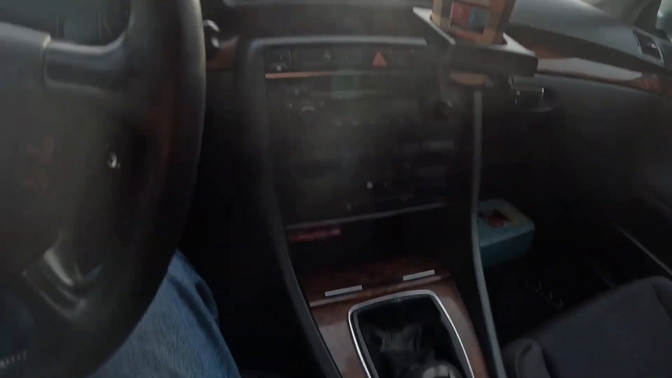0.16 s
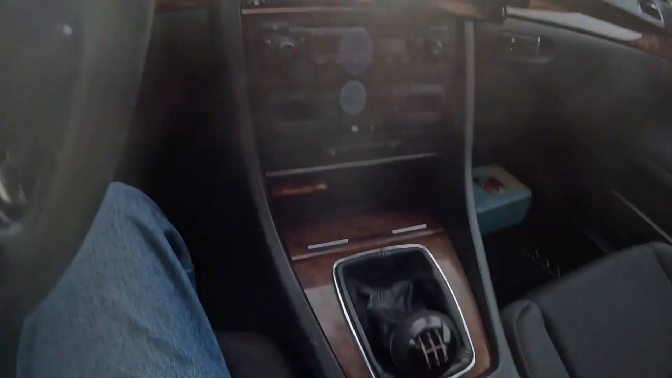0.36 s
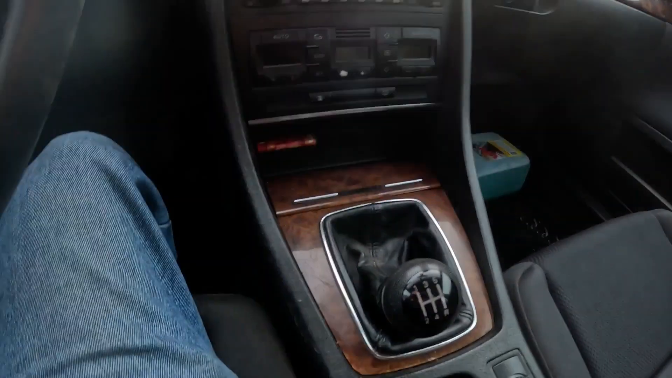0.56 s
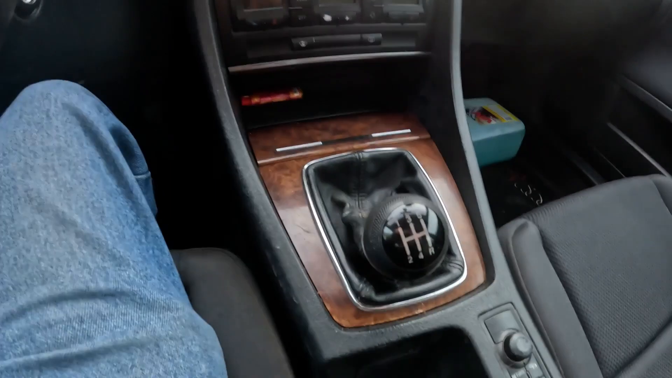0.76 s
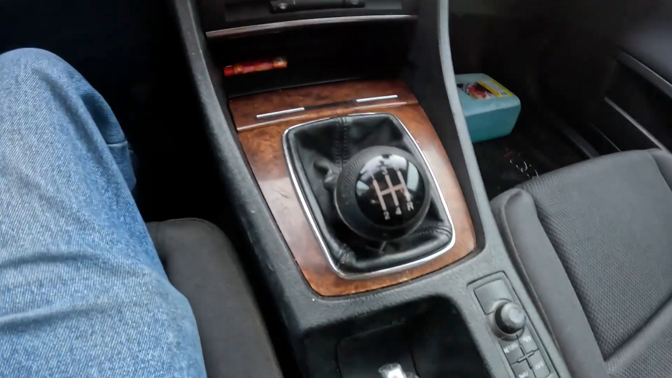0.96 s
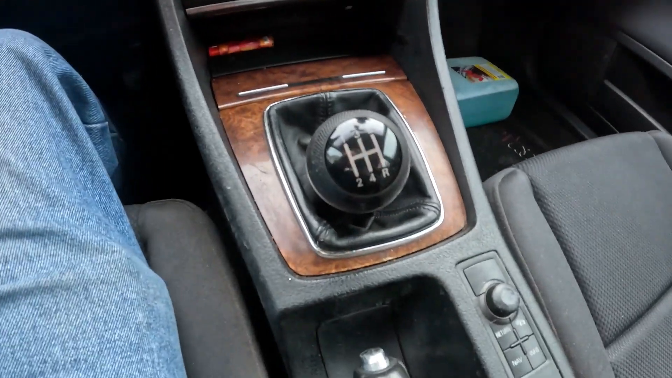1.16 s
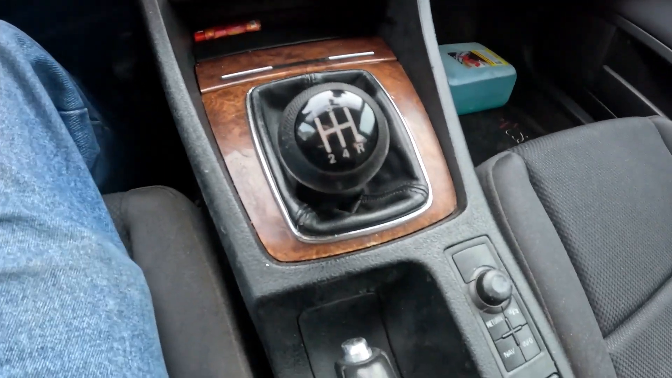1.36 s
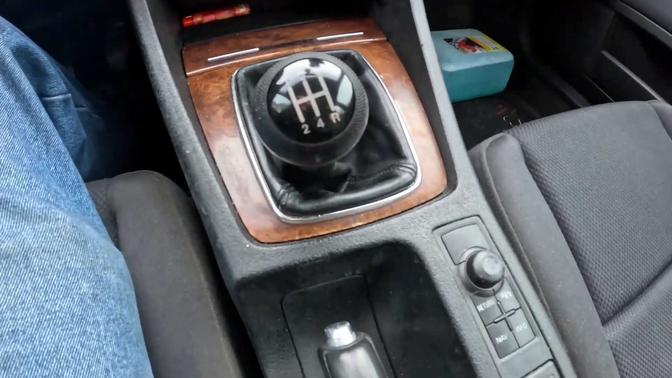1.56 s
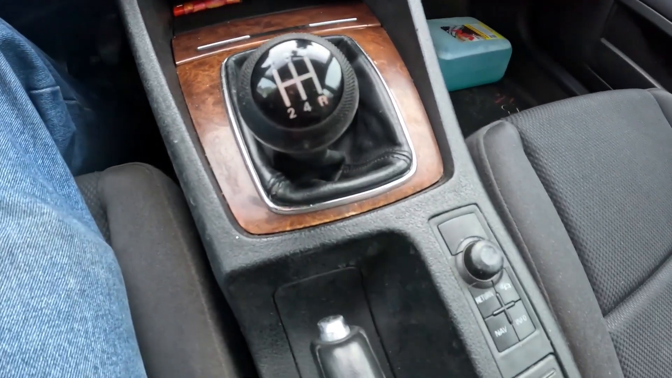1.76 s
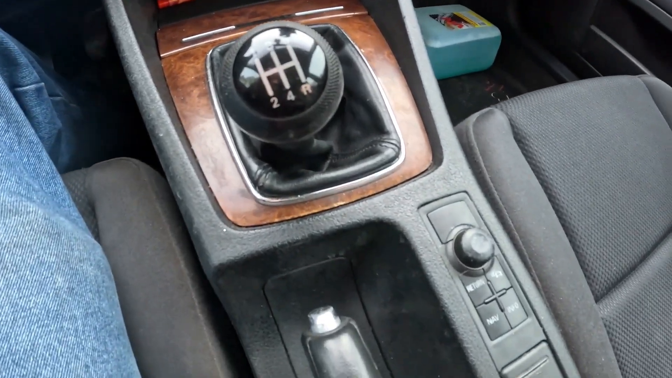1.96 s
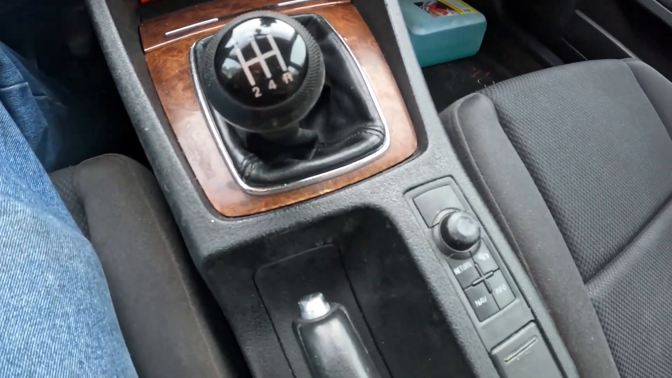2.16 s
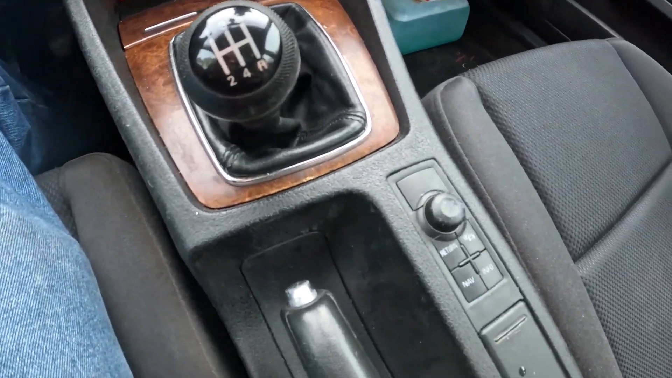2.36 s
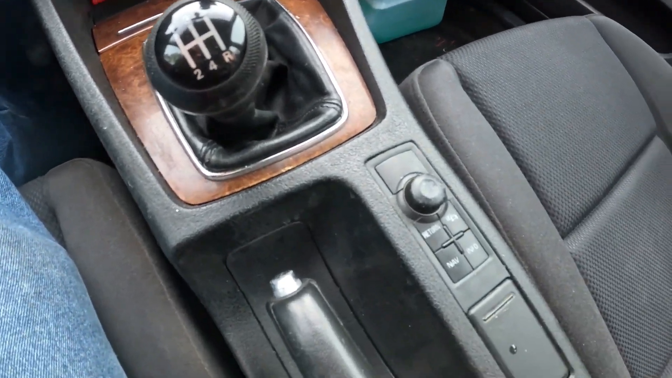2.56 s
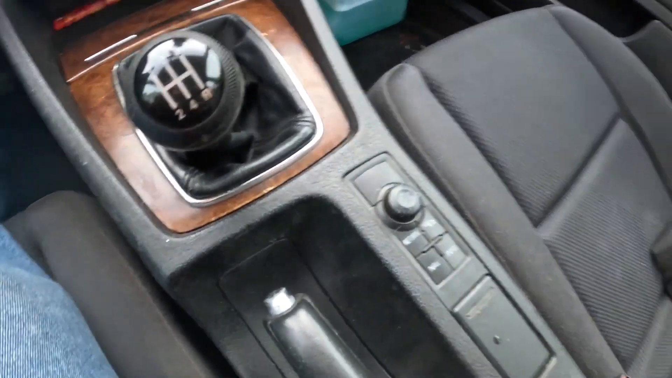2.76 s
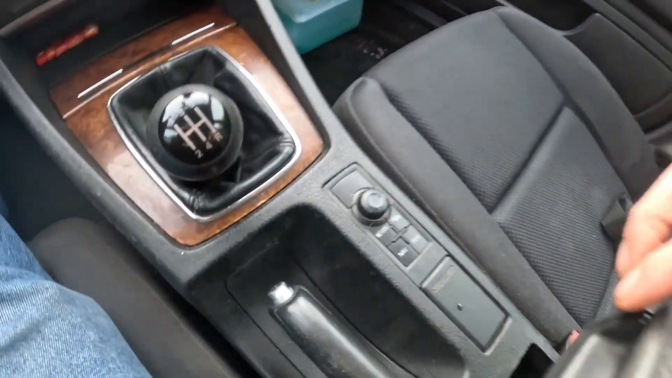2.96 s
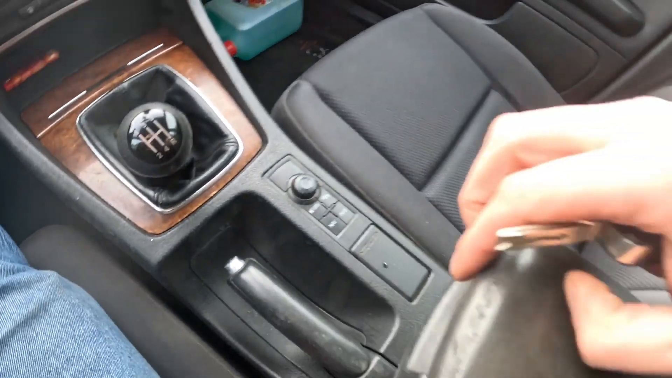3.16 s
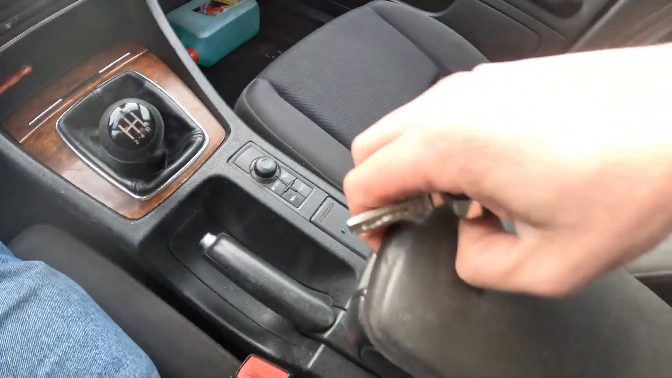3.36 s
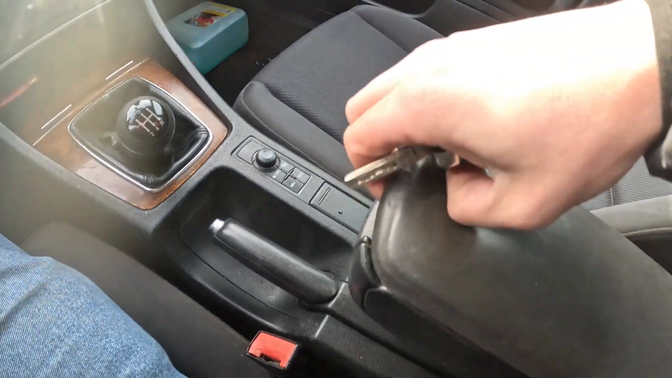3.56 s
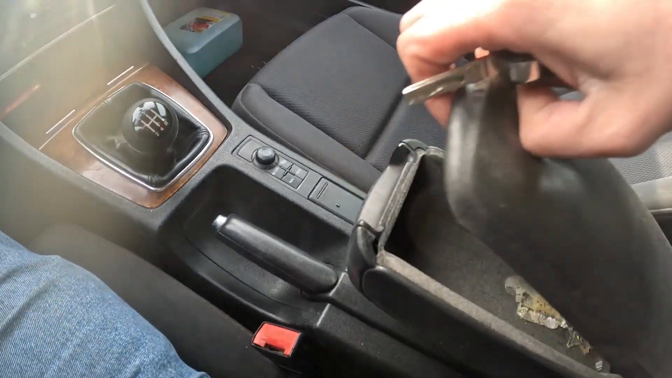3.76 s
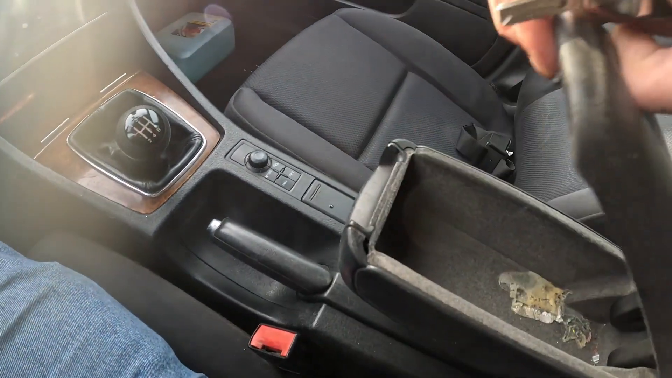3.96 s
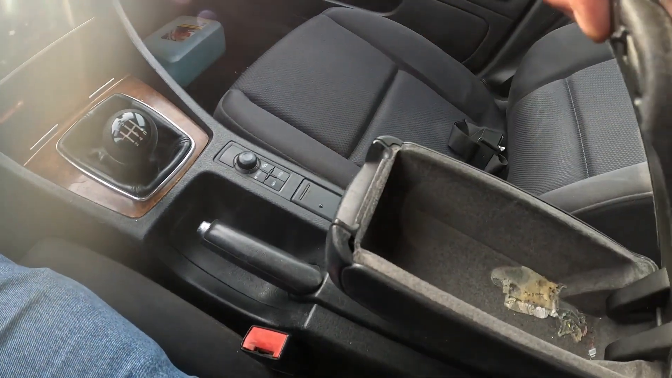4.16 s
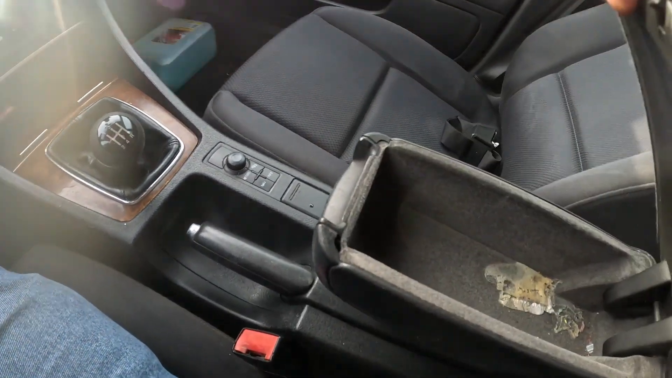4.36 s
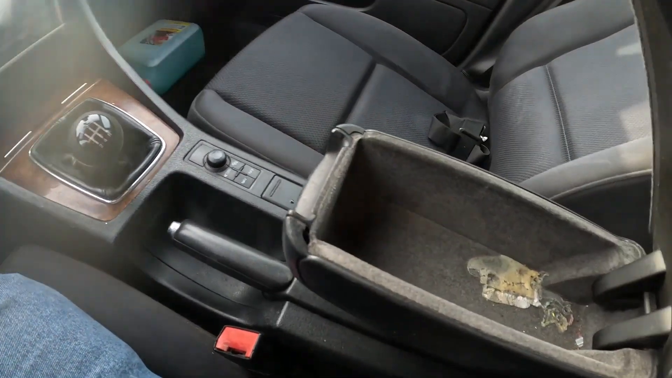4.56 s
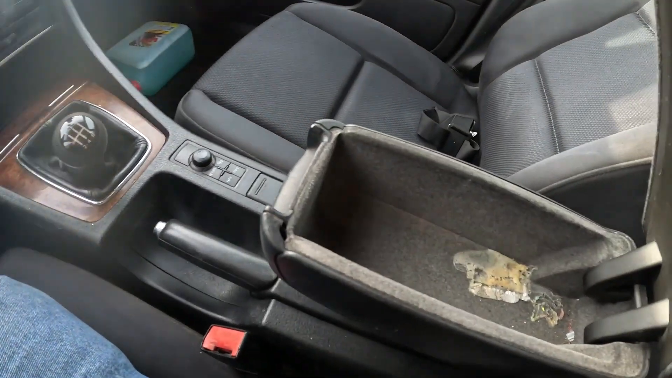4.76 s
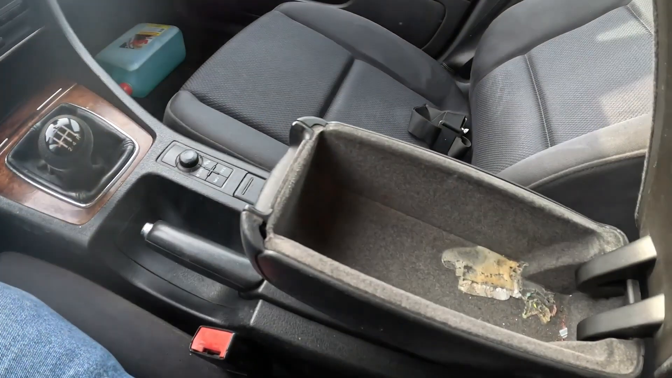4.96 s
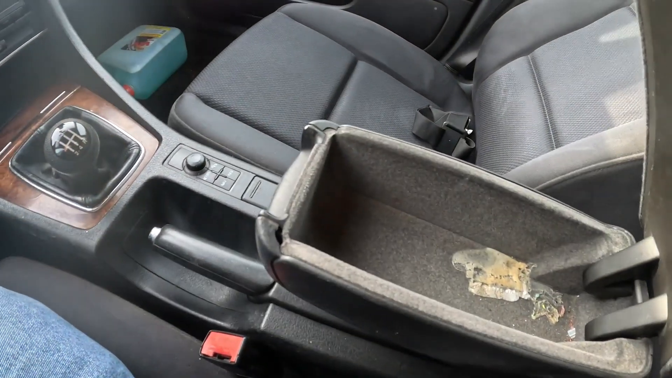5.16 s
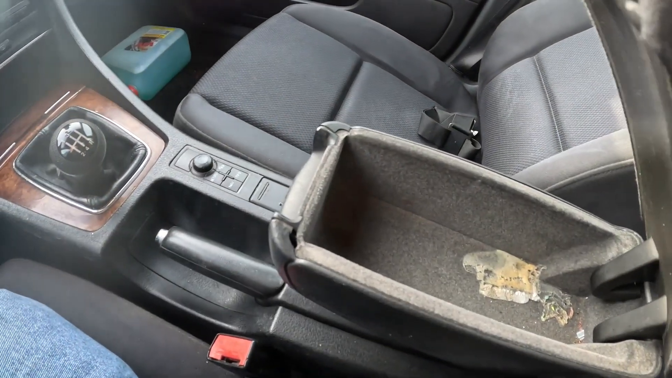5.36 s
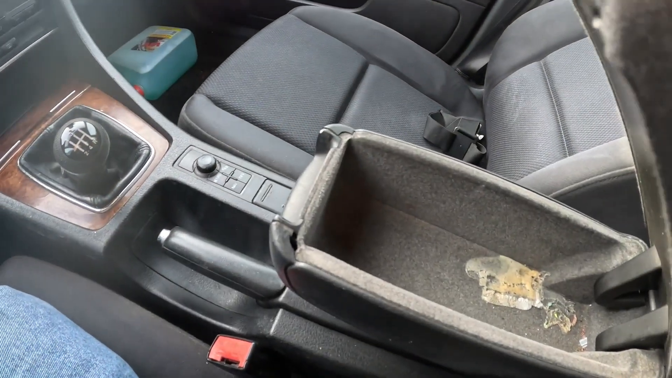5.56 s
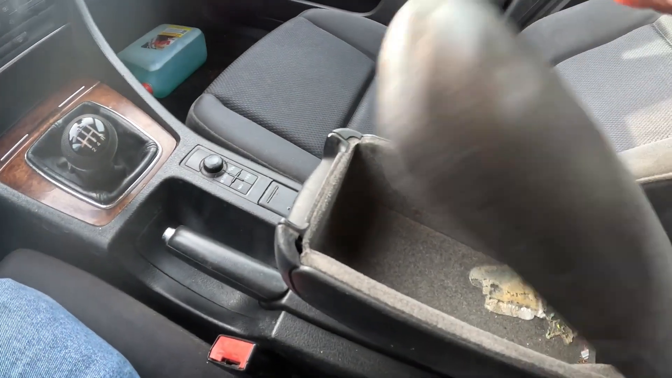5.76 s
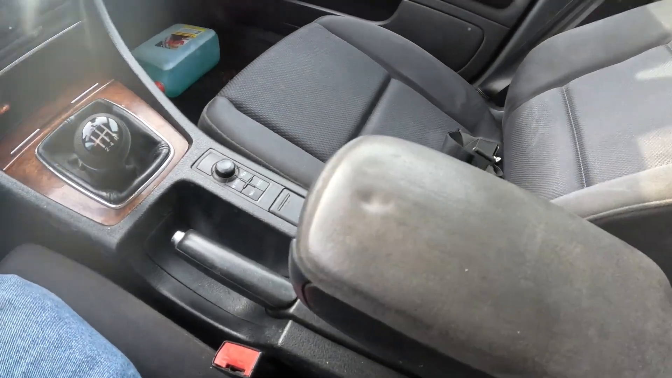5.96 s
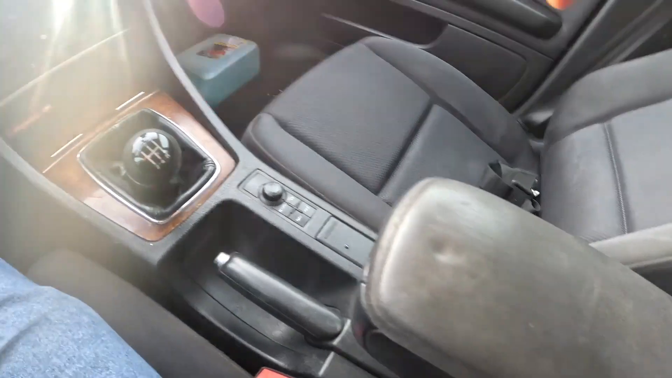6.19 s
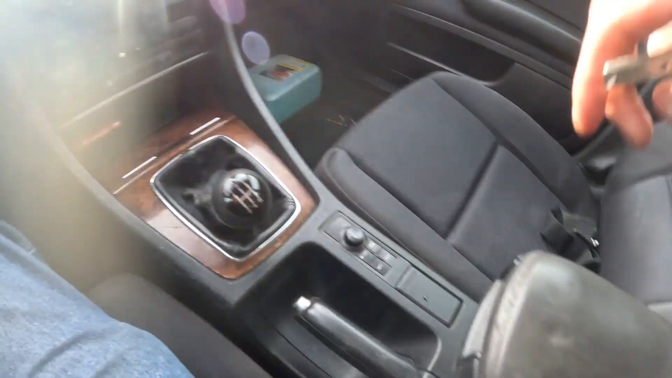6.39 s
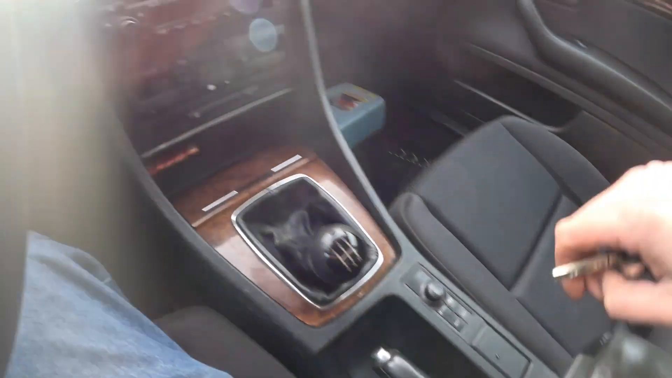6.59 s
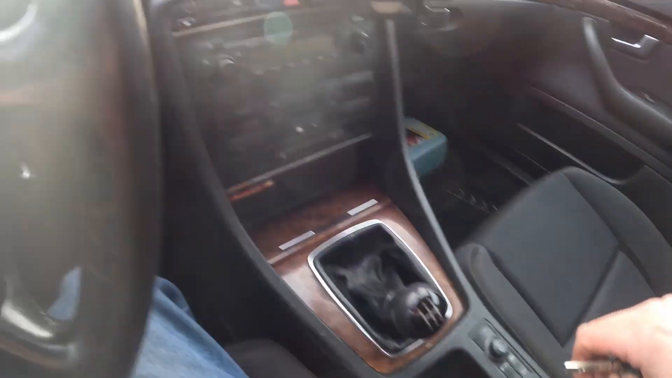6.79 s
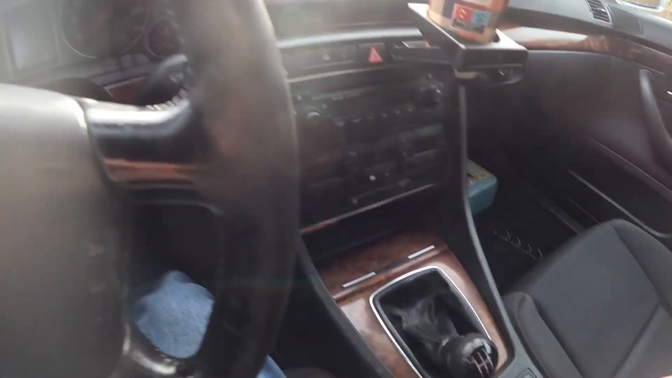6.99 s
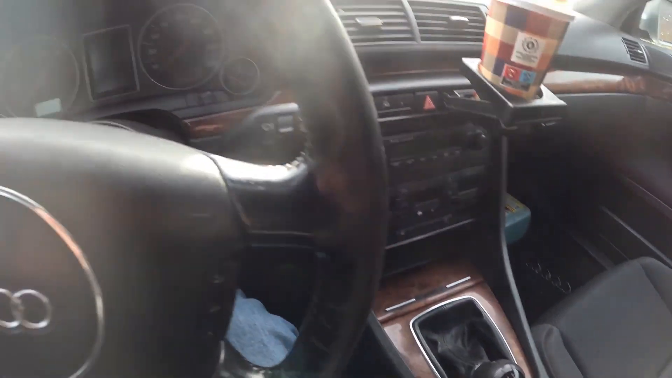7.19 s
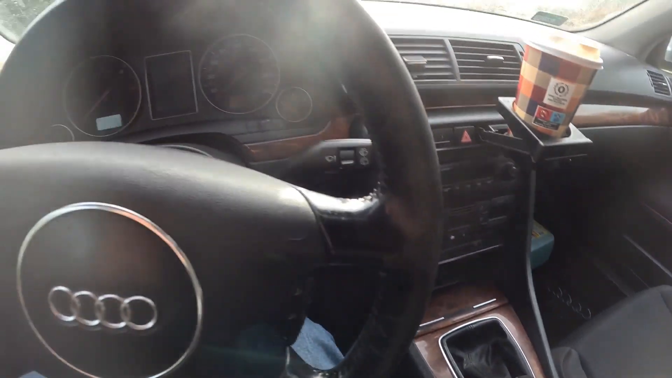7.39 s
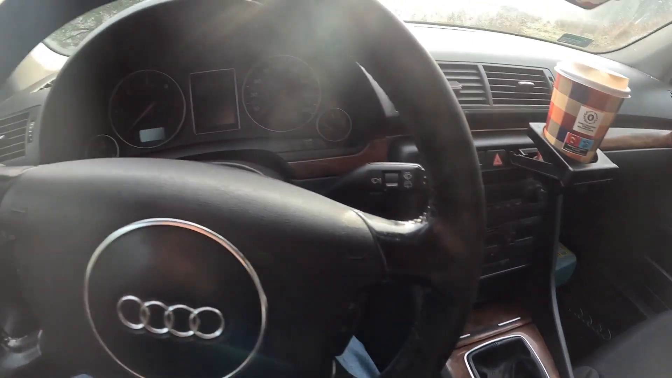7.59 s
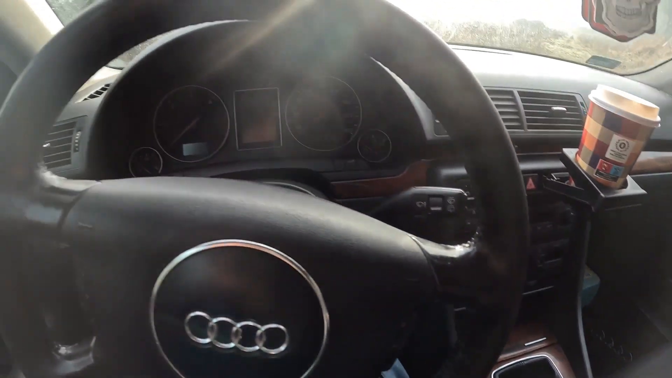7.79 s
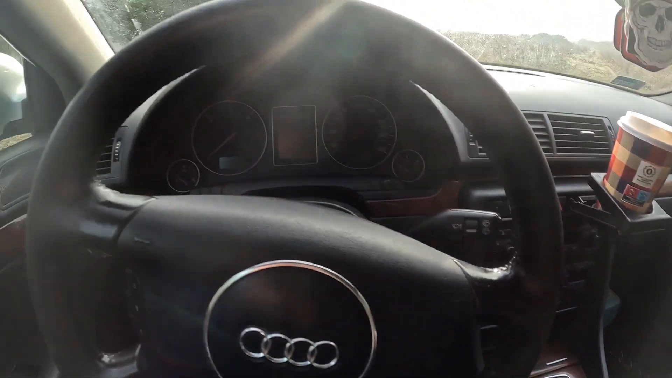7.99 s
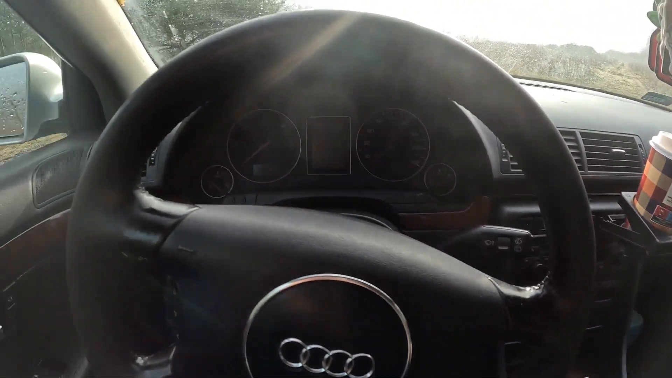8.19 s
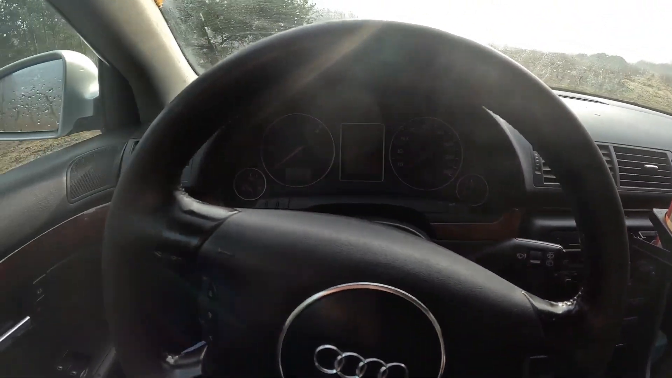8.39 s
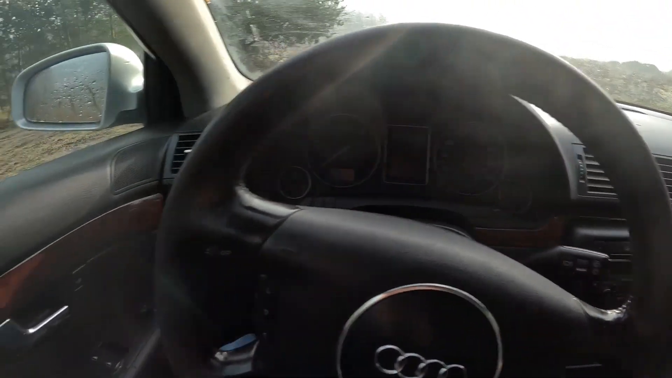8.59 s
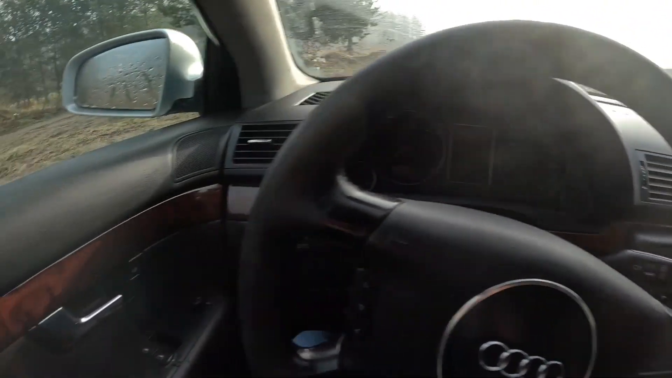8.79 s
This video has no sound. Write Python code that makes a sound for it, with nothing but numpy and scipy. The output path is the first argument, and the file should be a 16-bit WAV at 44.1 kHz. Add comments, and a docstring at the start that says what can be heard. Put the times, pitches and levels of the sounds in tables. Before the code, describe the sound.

A car's armrest lid is opened and slammed, heard close up in the small padded cabin. After a faint low boom and some rustling of clothes, a palm drags across leather while the latch and hinge click and briefly creak. The lid falls with a sharp, hollow clunk, by far the loudest sound, and bounces twice. Light metallic ticks of a key in the ignition follow, with more rustling and soft microphone rumble. The engine stays off.

```python
"""The lid of a car's armrest drops shut, close to a hand-held stereo microphone: shell and box clunk,
and it bounces twice. We are inside the parked car, engine off. Before the slam a hand rubs over the
crackling leather, unlatches the lid and lifts it through the clicks and stick-slip creaks of the hinge.
Afterwards a key rattles over the pins of the ignition lock. The driver's clothes rustle throughout;
behind them lie a faint boom of cabin air at the start, handling rumble, a low hum and hiss."""
import sys
import numpy as np
from scipy import signal
from scipy.fft import rfft, irfft
from scipy.io import wavfile
from scipy.ndimage import uniform_filter1d

SR = 44100
rng = np.random.default_rng(int(sys.argv[2]) if len(sys.argv) > 2 else 0)


def inscribe(sig):
    """Save sig as 16-bit PCM at rate SR to the path in sys.argv[1].

    A 1-D sig is mono; a 2-D sig holds one channel per row.
    Samples are clipped to [-1, 1] before scaling.
    """
    pcm = np.round(np.clip(np.atleast_2d(sig).T, -1, 1) * 32767)
    wavfile.write(sys.argv[1], SR, pcm.astype(np.int16))


N = 389844
TIME = np.arange(N) / SR
AGE = np.arange(SR // 4) / SR  # time since a blow, s
ATTACK = SR // 100  # a click's level is its energy spread over this many samples

# the lid lands on its pad, hits the rim and bounces:
# t/s, level/dB, contact/ms, box pitch/ratio, relative crack/dB, box ring time/ratio
LID_BLOWS = [(5.8998, -13, 1.4, 1.13, -21, 0.73), (5.9096, -2, 0.13, 1, -6, 0.95),
             (5.9915, -17, 0.4, 1.19, -14, 1), (6.032, -17, 1.3, 1.03, -28.5, 0.68)]
# modes of the lid's shell: f/Hz, level/dB, t60/s
SHELL_MODES = [(714, -18.5, .03), (785, -15, .028), (897, -13, .04), (1070, -3, 0.023), (1437, -25.5, .035),
               (1559, -18.5, .045), (1857, -24.5, 0.054), (2395, -28, .028), (2850, -13, 0.012),
               (3400, -19.5, .016), (3966, -20.5, .016), (4730, -24.5, .018), (5400, -30.5, .016),
               (7500, -24, .016), (9200, -33.5, .016)]
# modes of the air in the box under the lid: f/Hz, level/dB, t60/s
BOX_MODES = [(186, -8.5, .045), (222, 2, 0.068), (288, -11.5, 0.046), (370, -27, .05)]
# spectrum of the rim's crack: f/Hz, gain/dB
RIM_COLOUR = [(100, -22.5), (300, -7.5), (520, -6.5), (720, 1.5), (1200, 3), (1700, 0.5), (2150, -19),
              (2500, -8), (3200, -2), (4500, -13), (7800, -18.5), (11000, -28.5), (15000, -50.5)]
# the slam at the two microphone ports: f/Hz, left minus right/dB
SLAM_BALANCE = [(110, -0.5), (200, -1), (500, -2.5), (1200, -2.5), (2400, 1.5), (4400, 1), (12000, 1.5)]
# dull thumps through seat and console: t/s, level/dB, f/Hz, t60/s
DULL_THUMPS = [(0.76, -32.5, 71.5, 0.094), (1.077, -40.5, 219, 0.074), (2.84, -32, 64.4, 0.19),
               (3.607, -18.5, 387, 0.078), (3.631, -22, 60, 0.072), (3.651, -26, 49.3, 0.15),
               (4.255, -44, 151, 0.037), (4.573, -22, 149, 0.02), (4.655, -20, 172, 0.031),
               (5.895, -20.5, 52, .2), (5.916, -28.5, 75.8, .3), (5.987, -20.5, 61.5, 0.11),
               (6.03, -27.5, 73.6, 0.27), (6.074, -43.5, 93, 0.22), (8.779, -45, 138, 0.13)]
# plastic clicks of latch, hinge and trim:
# t/s, level/dB, relative body/dB, relative treble/dB, t60/s, the part's note f/Hz
PLASTIC_CLICKS = [(.043, -57.5, -0.5, 2, 0.031, 3750), (.474, -72, 11, -1, .04, 600),
                  (.566, -60.5, 1, -3, 0.065, 890), (.894, -49, -1, -11, 0.047, 630),
                  (.919, -42, -1.5, -13.5, 0.048, 1140), (1.07, -42, -14, -28, 0.032, 1250),
                  (1.445, -56.5, -19, -4, 0.032, 610), (1.476, -59, 5, -2, 0.072, 640),
                  (1.525, -57.5, 1.5, -17, 0.096, 1170), (1.591, -57, 2.5, -3, 0.066, 1590),
                  (1.956, -50, -15, 0, 0.055, 590), (2.789, -51, 9, -5.5, 0.045, 1320),
                  (2.835, -34, -6, -3.5, 0.06, 1750), (2.9, -43, 3.5, -8, 0.037, 700),
                  (2.927, -43.5, -3, -19, 0.035, 1320), (2.949, -45, 0.5, 1, 0.092, 636),
                  (2.996, -42, 2, -6, 0.095, 1320), (3.0195, -31.5, -3.5, -10, 0.025, 1350),
                  (3.362, -28, -2, -14, 0.035, 816), (3.401, -43.5, -1, -2, 0.045, 658),
                  (3.433, -48, 9, -18, 0.031, 605), (3.468, -37.5, -5.5, -7, 0.066, 930),
                  (3.51, -32.5, -2, -0.5, 0.067, 1100), (3.535, -31.5, -7, -12, 0.053, 960),
                  (3.557, -32, -2, -16.5, 0.034, 1130), (3.573, -57, -5, -24, 0.022, 950),
                  (3.6065, -25.5, -3, -6.5, 0.09, 630), (3.621, -28.5, 4, -19, 0.016, 1050),
                  (3.821, -35, -6, -13.5, 0.034, 586), (3.885, -33, -19, -6.5, 0.04, 2240),
                  (4.047, -31, -15.5, -3, 0.038, 1520), (4.147, -32.5, -21.5, -1, 0.034, 1270),
                  (4.571, -46, 8.5, -7.5, 0.062, 980), (4.6355, -31.5, -4, -9.5, 0.03, 1730),
                  (4.655, -38, 3.5, -8, 0.0068, 494), (5.257, -36.5, -21, -5.5, 0.071, 1560),
                  (5.266, -43.5, -6.5, -27, 0.034, 1150), (5.275, -46.5, 3, -13, 0.061, 1550),
                  (5.72, -64, -8.5, 2, 0.097, 1430), (5.807, -59, -10.5, 5, 0.066, 2400),
                  (6.0455, -46, 6.5, -14, 0.028, 585)]
# resonances of the hollow plastic console: f/Hz, width/Hz, level/dB
CONSOLE_MODES = [(203, 52, -7.5), (343, 190, -6), (544, 390, -4.5), (708, 180, 0.5), (994, 86, -0.5),
                 (1190, 167, 1), (1470, 350, -4), (2110, 150, -7), (2560, 680, -8.5), (3240, 720, -6.5),
                 (4550, 920, -8), (5654, 1500, -10.5), (6650, 900, -11.5), (7560, 450, -16),
                 (9300, 1200, -24.5), (12600, 1600, -39.5)]
# where the clicks lie as the microphone turns: t/s, left minus right/dB
CLICK_BEARING = [(0, 0), (2, 1.5), (2.85, -1.5), (3.45, -1), (4.1, -2.5), (4.65, -4), (5.8, -2.5), (7, 3.5)]
# knocks on stiff parts: t/s, level/dB, f/Hz, t60/s
RINGING_KNOCKS = [(1.071, -36.5, 1284, .05), (4.637, -29, 1730, 0.026), (7.9635, -47, 661, 0.046)]
# creaks of the hinge: t/s, length/s, level/dB, main resonance f/Hz, muffled above f/Hz
HINGE_CREAKS = [(4.636, 0.0045, -34.5, 657, 1390), (5.265, 0.018, -52, 660, 1400),
                (5.467, 0.0073, -41, 568, 1510), (5.482, 0.014, -47.5, 572, 1540),
                (5.506, 0.0065, -54, 581, 640), (5.575, 0.0033, -43, 602, 1580),
                (5.585, 0.0081, -47, 583, 750), (5.608, 0.0094, -54, 580, 600)]
# modes of the hinge: multiple of the main resonance, level/dB, t60/s
HINGE_MODES = [(0.599, -23, 0.023), (1, 7.5, 0.046), (1.801, 3, 0.017), (2.3, -5, .015), (2.7, -39, 0.019)]
# the key finds the lock, rattles in, seats and turns:
# t/s, level/dB, relative treble/dB, the pin's note f/Hz, relative tick of the tip/dB
KEY_CONTACTS = [(6.769, -60, 2, 7750, 0), (6.974, -52, 7.5, 4780, -16), (6.989, -49.5, 1.5, 3570, -22),
                (7.011, -45.5, 1, 5240, -26), (7.0354, -52, 2, 3400, -25), (7.052, -49, 0.5, 3570, -26),
                (7.0732, -52, 3.5, 4500, -23), (7.0995, -50, 4, 3500, -28), (7.214, -53, 6, 6050, -17.5),
                (7.364, -54, -4, 910, -16), (7.598, -72.5, 16, 3340, 9), (7.964, -51.5, 6, 6400, -9)]
# modes of the lock and its column: f/Hz, level/dB, t60/s
LOCK_MODES = [(225, -5.5, 0.088), (423, -6, 0.085), (660, -2.5, 0.038), (791, -2.5, 0.044),
              (1073, -1, 0.022), (1310, 0.5, 0.026), (1690, 4, 0.0068), (2437, -4, 0.015),
              (3090, 1.5, 0.01), (3640, 1, 0.011), (4790, 5, 0.0027), (6090, 2.5, 0.0037),
              (7420, 3, 0.0026), (9200, -3.5, 0.0033)]
# the palm judders over the leather, slower as it grips: t/s, slip rate/Hz, level/dB
PALM_JUDDER = [(3.04, 133, -59), (3.12, 118, -56), (3.17, 104, -51.5), (3.21, 92, -45.5), (3.25, 70, -48),
               (3.29, 61, -46), (3.34, 54, -43.5), (3.42, 35, -46)]
# fingers crease the leather: start t/s, length/s, level/dB
LEATHER_STROKES = [(2.8, 0.36, -57.5), (3.08, 0.43, -54), (3.45, 0.11, -55.5), (4.84, 0.2, -75),
                   (7.4, 0.3, -68)]
# spectrum of its crackle: f/Hz, gain/dB
CRACKLE_COLOUR = [(300, -16), (600, 4), (1300, -5), (2000, -8), (2700, 3), (3500, -1), (4100, -6.5),
                  (4900, -3), (6500, -11), (10000, -24), (15000, -32)]
# the palm drags on the padding, weight shifts in the seat: start t/s, length/s, level/dB
PADDING_STROKES = [(0.8, 0.51, -67), (1.38, 0.75, -75), (2.75, 0.29, -52.5), (2.98, 0.91, -46.5),
                   (3.65, 0.83, -64.5), (4.45, 0.34, -61.5), (5.2, 0.48, -60.5), (5.65, 0.5, -58),
                   (6.349, 0.6, -61.5), (6.849, 0.36, -63.5), (7.1, 0.6, -66.5), (7.6, 0.63, -72),
                   (8.4, 1, -66.5)]
# spectrum of that drag: f/Hz, gain/dB
PADDING_COLOUR = [(60, -20), (95, 2.5), (130, 2), (199, 0.5), (295, -0.5), (435, -4), (570, -6.5),
                  (835, -14.5), (1030, -10.5), (1200, -13), (1560, -38), (2640, -120)]
# scuffs of sleeve, seat and padding, and one late swell of low hum near 140 Hz: middle t/s, length/s, level/dB,
# f/Hz, width/Hz
BRIEF_SCUFFS = [(0.266, 0.051, -67, 700, 900), (0.489, 0.06, -68, 7600, 910),
                (0.773, .32, -60.5, 1290, 151), (0.971, 0.35, -61.5, 1130, 171.5),
                (0.995, 0.31, -69, 334, 140), (2.524, .3, -69.5, 1380, 400),
                (3.077, 0.19, -62.5, 4940, 5000), (3.711, 0.25, -66, 3800, 3500),
                (3.791, 0.087, -42.5, 660, 520), (4.496, 0.24, -70.5, 1790, 400),
                (4.893, 0.057, -53, 820, 650), (5.398, 0.12, -58, 370, 150),
                (5.746, 0.12, -59.5, 524, 78.5), (5.902, 0.053, -30.5, 950, 600),
                (5.899, 0.064, -50.5, 3300, 3000), (5.902, 0.068, -27.5, 285, 200),
                (5.964, 0.049, -40, 402, 49.5), (7.324, 0.04, -56, 803, 700),
                (7.436, 0.052, -57.5, 857, 717), (8.45, 0.82, -65.5, 140.6, 50),
                (8.778, 0.024, -52, 599, 390)]
# strokes of sleeve and jeans: start t/s, length/s, level/dB, relative treble/dB
CLOTH_STROKES = [(-0.3, 0.69, -72, 2), (0.152, .7, -71.5, -1.5), (0.538, 0.68, -65, -4),
                 (0.969, .38, -62, -5.5), (1.289, .52, -64.5, -2), (1.6, 0.58, -77.5, 1.5),
                 (2.194, 0.58, -72, -1), (2.722, .35, -56, -2), (2.978, 0.55, -50.5, -7),
                 (3.398, .23, -53, -3.5), (3.48, 0.63, -60.5, -5), (3.892, .5, -65.5, -2.5),
                 (4.25, .35, -74.5, -6.5), (4.457, .29, -63.5, -3), (4.631, 0.42, -73.5, 2),
                 (4.848, 0.57, -76.5, -2), (5.152, .3, -66, -4.5), (5.254, .55, -82.5, -4),
                 (5.7, .3, -67, 2.5), (5.853, 0.78, -72.5, -2), (6.201, 0.99, -68.5, -2.5),
                 (6.803, 0.35, -63, 1.5), (7.016, 0.49, -66.5, -5.5), (7.3, .4, -63.5, -3),
                 (7.552, .5, -72, -2.5), (7.599, .75, -80.5, -7), (8.443, 0.74, -71, -1)]
# spectrum of their rustle: f/Hz, gain/dB
RUSTLE_COLOUR = [(470, -30.5), (800, -21.5), (1100, -6.5), (1320, -6), (1590, -7), (2470, -14.5),
                 (3320, -11.5), (4350, -15.5), (4910, -12), (5830, -15), (7280, -16), (8330, -21.5),
                 (10100, -23.5), (12200, -30.5), (15000, -52)]
# treble resonances of the weave: f/Hz, width/Hz
WEAVE_BANDS = [(4300, 700), (5400, 900), (7400, 1000)]
# gliding swishes of denim and sleeve: start t/s, length/s, level/dB, first f/Hz, last f/Hz
DENIM_SWISHES = [(.48, 0.46, -78, 7300, 7750), (.55, 0.41, -72, 4630, 4230),
                 (0.952, 0.42, -67.5, 3910, 4320), (1.397, 0.44, -70, 4700, 5320),
                 (1.477, 0.26, -67, 2900, 3160), (2.278, 0.51, -72.5, 5160, 5920),
                 (3.124, 0.4, -57, 4670, 5160), (7.373, 0.32, -61.5, 3300, 3760)]
# handling rumble on the microphone: t/s, level/dB
HANDLING_LEVEL = [(0.2, -55), (1.6, -54), (2.1, -58), (2.6, -58), (2.9, -45), (3.6, -42.5), (4.25, -61),
                  (4.6, -48), (5.15, -55.5), (5.85, -59), (6.02, -43.5), (6.3, -59), (6.95, -54),
                  (7.5, -59.5), (8.2, -60), (8.84, -52)]
# its spectrum: f/Hz, gain/dB
HANDLING_COLOUR = [(8.8, -26.5), (15, 6), (57, -3.5), (68, -9.5), (87, -16), (130, -19.5), (166, -27),
                   (300, -28), (390, -50.5), (660, -120)]
# bands of the cabin's low hum: f/Hz, width/Hz, level/dB
HUM_BANDS = [(53, 14, -63.5), (122, 8.6, -79.5)]
# slow swell of the hum: t/s, gain/dB
HUM_SWELL = [(0, 7.5), (1.3, -8), (2.4, 6), (3.9, -2), (4.5, -8), (5.2, -1), (6.6, -3), (7.6, -11),
             (8.84, -15)]
# spectrum of the steady hiss: f/Hz, gain/dB
HISS_COLOUR = [(100, -3.5), (300, 0.5), (450, -2.5), (850, -9.5), (1250, -5.5), (2300, -15), (3800, -18.5),
               (5200, -13.5), (7500, -14.5), (8500, -18), (11000, -25), (15000, -36)]


def lid(crack_t60=.025, rattle_db=-21, rattle_t60=.065, box_swell_s=.008, leak_hz=170):
    """Each blow pushes the shell and squeezes the box; a longer contact is duller. The rim cracks."""
    out = np.zeros((2, N))
    for s, db, contact_ms, pitch, crack_db, life in LID_BLOWS:
        push = AGE * np.exp(-AGE / (contact_ms * 1e-3 / 4))
        box = ring([(hz * pitch, mode_db, t60 * life) for hz, mode_db, t60 in BOX_MODES])
        response = ring(SHELL_MODES) - box * (1 - fade(box_swell_s))
        body = band(drive(push / push.sum(), response), leak_hz, "highpass", order=1)
        scatter = noise(len(AGE), side_db=-6) * (fade(crack_t60) + undb(rattle_db) * fade(rattle_t60))
        crack = unit(colour(scatter, RIM_COLOUR)) * np.sqrt(np.mean(fade(crack_t60) ** 2))
        add(out, s, (body + undb(crack_db) * crack) * undb(db))
    return out


def thumps():
    """Soft blows swing a panel or the cabin air for a few cycles."""
    out = np.zeros((2, N))
    taper = np.sqrt(np.linspace(1, 0, len(AGE)))
    for s, db, hz, t60 in DULL_THUMPS:
        add(out, s, ring([(hz, db, t60)]) * taper)
    return band(out + 1e-18, 930, "lowpass", order=2)


def clicks(snap_db=17, tail_db=-24, tail_t60=.13):
    """A sharp release and its scatter off nearby trim ring the console and the part's own note."""
    out = np.zeros((2, N))
    count = SR // 10
    console = sum((-1) ** k * width * ring([(hz, db, np.log(1000) / np.pi / width)])
                  for k, (hz, width, db) in enumerate(CONSOLE_MODES))
    registers = [band(console, edges, "bandpass") for edges in ((130, 410), (450, 2500), (2500, 22000))]
    lives = 1.2, 1, .7  # ring time ratios: the treble dies first
    for s, db, body_db, treble_db, t60, hz in trim_ticks() + list(PLASTIC_CLICKS):
        scatter = noise(count, side_db=-5)
        levels_db = db + np.array([body_db - 4.5, -3.5, treble_db - 4.5])
        for register, life, level_db in zip(registers, lives, levels_db):
            force = scatter * (fade(t60 * life) + undb(tail_db) * fade(tail_t60 * life))[:count]
            force[:, 0] += undb(snap_db)
            part = drive(force, stress(register[:count // 2], hz, boost_db=3.5, width_share=.12))
            add(out, s, unit(part) * np.sqrt(ATTACK / part.shape[1]) * undb(level_db) * bearing(s))
    return out


def knocks():
    """A stiff part rings briefly with one note."""
    out = np.zeros((2, N))
    for s, db, hz, t60 in RINGING_KNOCKS:
        add(out, s, ring([(hz, db, t60)]) * bearing(s))
    return out


def creaks(slip_hz=210, grit_db=-24):
    """Uneven slips, with grit between them, ring the hinge under its padding."""
    out = np.zeros((2, N))
    for s, length, db, hz, muffle_hz in HINGE_CREAKS:
        gap, size = .5 + rng.random((2, 20))
        slip_times = (np.cumsum(gap) - gap[0]) / slip_hz
        force = undb(grit_db) * noise(len(AGE), side_db=2)
        force += np.bincount((slip_times * SR).astype(int), size, len(AGE))[:len(AGE)]
        hinge = ring([(hz * multiple, mode_db, t60) for multiple, mode_db, t60 in HINGE_MODES])
        muffled = band(drive(force * (AGE < length), hinge), muffle_hz, "lowpass")
        add(out, s, unit(muffled) * np.sqrt(length / AGE[-1]) * undb(db))
    return out


def key(gain_db=-1, snap_db=9, scrape_t60=.051, tip_t60=.024, tip_db=-6):
    """Each pin snaps against the key with a bright tick and a short scrape that ring the lock."""
    out = np.zeros((2, N))
    lock = sum((-1) ** k * ring([mode]) for k, mode in enumerate(LOCK_MODES))
    registers = band(lock, 2470, "lowpass"), band(lock, (2500, 10500), "bandpass")
    for s, db, treble_db, hz, tick_db in KEY_CONTACTS:
        force = noise(len(AGE), side_db=-7) * fade(scrape_t60)
        force[:, 0] += undb(snap_db)
        body, pin = (drive(force, stress(x, hz, boost_db=4, width_share=.18)) for x in registers)
        tip = band(noise(len(AGE), side_db=-6.5) * fade(tip_t60), (9500, 13000), "bandpass", order=2)
        for part, part_db in ((body, 0), (pin, treble_db), (tip, tick_db + tip_db)):
            add(out, s, unit(part) * np.sqrt(ATTACK / len(AGE)) * undb(db + part_db + gain_db) * pan(.5))
    return out


def judder(tap_db=-.5, grit_db=-7, grit_decay_cycles=.93, jitter_share=.16, spread_db=2.5):
    """Skin sticks and slips on the padding: a soft tap and a puff of grit in each uneven cycle."""
    rate, level_db = curve(PALM_JUDDER)
    phase = np.cumsum(rate * (1 + jitter_share * walk(120))) / SR % 1
    slips = (np.diff(phase, prepend=0) < 0) * undb(spread_db * walk(150))
    taps = colour(slips[None], [(90, -9), (200, 2), (300, 5), (450, -1), (590, 5), (740, -12),
                                (1100, -6), (2200, -23), (12000, -73)])
    puffs = noise(N, side_db=-2) * np.exp(-phase / grit_decay_cycles)
    grit = colour(puffs, [(700, -18), (1100, -13), (1700, 2), (2300, -1), (3000, 1), (3600, 2),
                          (4200, -7), (5000, -12), (6500, -9), (12000, -38)])
    touching = (TIME > PALM_JUDDER[0][0]) & (TIME < PALM_JUDDER[-1][0])
    return (undb(tap_db) * unit(taps) + undb(grit_db) * unit(grit)) * undb(level_db) * touching


def leather(cracks_per_s=170, crack_t60=.012, size_range_db=14):
    """Creases let go at uneven moments, each with a tiny crack of its own size."""
    chance, size = rng.random((2, N))
    cracks = (chance < cracks_per_s / SR) * undb(size_range_db * size)
    bursts = signal.oaconvolve(cracks, fade(crack_t60))[:N]
    return unit(colour(noise(N, side_db=-4.5) * bursts, CRACKLE_COLOUR)) * strokes(LEATHER_STROKES)


def padding(gain_db=-1):
    """Skin and clothes drag on hollow upholstery, low and rough."""
    drag = colour(friction(side_db=-.5, grain_db=2.5, flutter_db=3.5), PADDING_COLOUR)
    return unit(drag) * strokes(PADDING_STROKES) * undb(gain_db)


def scuffs():
    """Friction swells and dies away in one resonance of the thing that is rubbed; one long row is a low hum
    that swells and fades the same way."""
    out = np.zeros((2, N))
    for s, length, db, hz, width in BRIEF_SCUFFS:
        count = int(length * SR)
        edges = np.hypot(hz, width / 2) + np.array([-.5, .5]) * width
        resonance = band(noise(count, side_db=-5.5), edges, "bandpass", order=1)
        stroke = band(resonance, edges[1] * 1.1, "lowpass") * np.hanning(count)
        add(out, s - length / 2, unit(stroke) * undb(db) / 2)
    return out


def cloth(split_hz=2500, waver_db=1.8):
    """Sleeve and jeans slide, slightly left: a papery band and a hiss that grow with speed."""
    rustle = colour(friction(side_db=-4.5, grain_db=.5, flutter_db=1.88), RUSTLE_COLOUR)
    for hz, width in WEAVE_BANDS:  # each swells and sinks on its own
        resonance = band(rustle, (hz - width / 2, hz + width / 2), "bandpass", order=1)
        rustle = rustle + (undb(waver_db * walk(5.6)) - 1) * resonance
    treble = strokes([(s, length, db + treble_db) for s, length, db, treble_db in CLOTH_STROKES])
    papery = unit(band(rustle, split_hz, "lowpass")) * sliding()
    hiss = unit(band(rustle, split_hz, "highpass")) * treble
    return (papery + hiss) * pan(1.3)


def swishes(width_share=.18):
    """Ribs of cloth run over each other: a narrow band whose note glides with their speed."""
    out = np.zeros((2, N))
    base_hz = SR / 20
    edges = base_hz * np.exp(np.array([-.5, .5]) * width_share)
    for s, length, db, first_hz, last_hz in DENIM_SWISHES:
        count = int(length * SR)
        travel = np.cumsum(np.linspace(first_hz, last_hz, count)) / base_hz
        ribs = band(noise(int(travel[-1]) + 2, side_db=-8), edges, "bandpass", order=2)
        stroke = np.array([np.interp(travel, np.arange(len(side)), side) for side in ribs])
        add(out, s, unit(stroke * np.hanning(count)) * undb(db) / 2)
    return out


def trim_ticks(count=18, over_cloth_db=-1, spread_db=2, body_db=-4, treble_db=-2, t60=.031):
    """Click rows for faint ticks of trim, more frequent and stronger while the clothes slide."""
    motion = sliding()
    odds = np.cumsum(np.sqrt(motion - motion.min()))
    when, size, note = rng.random((count, 3)).T
    onsets = np.searchsorted(odds, (np.arange(count) + when) / count * odds[-1])
    levels_db = 20 * np.log10(motion[onsets]) + over_cloth_db + spread_db * (2 * size - 1)
    notes_hz = 580 * 2 ** (2 * note)  # spread over two octaves
    return [(i / SR, db, body_db, treble_db, t60, hz) for i, db, hz in zip(onsets, levels_db, notes_hz)]


def boom(db=-32.5, first_hz=40.4, sag_hz_per_s=57, hold_s=.076, release_s=.19):
    """The cabin air swings slowly, holds, then settles while its pitch sags."""
    hz = np.maximum(first_hz - sag_hz_per_s * TIME, 0)
    envelope = np.clip(1 - (TIME - hold_s) / release_s, 0, 1)
    return undb(db) * envelope * np.sin(2 * np.pi * np.cumsum(hz) / SR)


def handling(waver_db=1.9):
    """Low rumble of the hand on the microphone, nearly alike on both sides."""
    level_db, = curve(HANDLING_LEVEL)
    rumble = colour(noise(N, side_db=-11.5, side_hz=10), HANDLING_COLOUR)
    return unit(rumble) * undb(level_db + waver_db * walk(11))


def hum(waver_db=2):
    """Narrow bass resonances fill the cabin, swelling and sinking alike on both sides."""
    level_db, = curve(HUM_SWELL)
    tones = np.zeros(N)
    for hz, width, db in HUM_BANDS:
        edges = hz - width / 2, hz + width / 2
        tones += undb(db) * unit(band(rng.standard_normal(N), edges, "bandpass", order=2))
    return tones * undb(level_db + waver_db * walk(2.6))


def room_tone(db=-75.5):
    """An even, faint hiss under everything."""
    return unit(colour(noise(N, side_db=0), HISS_COLOUR)) * undb(db)


def cabin(x, wet_db, low_t60, high_t60):
    """A small padded room: weak early echoes, the bass stays longest."""
    low = band(noise(len(AGE), side_db=-9), 840, "lowpass") * fade(low_t60)
    high = band(noise(len(AGE), side_db=-6.5), (450, 4500), "bandpass", order=1) * fade(high_t60)
    echoes = (low + high) * (1 - fade(.025))
    echoes /= np.sqrt(2 * np.sum(echoes ** 2))
    return x + undb(wet_db) * signal.oaconvolve(x, echoes, axes=1)[:, :N]


def microphone_ports(x, balance, lag_ms):
    """A close source reaches the left port a little late; the balance depends on frequency."""
    f = np.maximum(np.arange(N // 2 + 1) * SR / N, 1)
    hz, db = np.transpose(balance)
    delay = np.exp(-2j * np.pi * f * lag_ms * 1e-3 * np.array([[.5], [-.5]]))
    return irfft(rfft(x) * pan(np.interp(np.log(f), np.log(hz), db)) * delay, N)


def friction(side_db, grain_db, flutter_db):
    """Countless tiny slips of uneven size under a wavering pressure."""
    grains = np.repeat(rng.exponential(size=N // 16 + 1), 16)
    sizes = undb(grain_db * np.minimum(uniform_filter1d(grains, 8)[:N], 6))
    return noise(N, side_db) * sizes * undb(flutter_db * walk(45))


def strokes(rows, rise_share=.64, speed_exponent=.87):
    """Amplitude of strokes (t/s, length/s, level/dB): each gathers speed, then brakes."""
    power = np.full(N, 1e-14)
    for s, length, db in rows:
        moving = slice(max(int(s * SR), 0), int((s + length) * SR))
        effort = np.interp((TIME[moving] - s) / length, [0, rise_share, 1], [0, 1, 0])
        speed = np.sin(np.pi / 2 * effort)
        power[moving] += (undb(db) * speed ** speed_exponent) ** 2
    return np.sqrt(power)


def sliding():
    """How strongly the clothes slide at each moment."""
    return strokes([row[:3] for row in CLOTH_STROKES])


def ring(modes):
    """Sum of damped sines (f/Hz, level/dB, t60/s)."""
    return sum(undb(db) * fade(t60) * np.sin(2 * np.pi * hz * AGE) for hz, db, t60 in modes)


def fade(t60):
    """Exponential decay after a blow."""
    return np.exp(-np.log(1000) * AGE / max(t60, 1e-3))


def drive(force, response):
    """The sound of a body with this response under this force."""
    return signal.fftconvolve(np.atleast_2d(force), np.atleast_2d(response), axes=1)[:, :len(AGE)]


def noise(count, side_db, side_hz=1200):
    """Stereo noise: a shared part and an opposed one, which fades for long waves."""
    mid, side = rng.standard_normal((2, count))
    return unit(mid + undb(side_db) * band(side, side_hz, "highpass", order=1) * np.array([[1], [-1]]))


def walk(rate_hz):
    """Smooth random drift with rms 1."""
    hold = int(SR / rate_hz)
    steps = np.repeat(rng.standard_normal(N // hold + 1), hold)
    return unit(uniform_filter1d(uniform_filter1d(steps, hold), hold)[:N])


def band(x, hz, kind, order=3):
    """Causal Butterworth filter."""
    return signal.sosfilt(signal.butter(order, hz, kind, fs=SR, output="sos"), x)


def stress(x, hz, boost_db, width_share):
    """Add a boosted copy of one band, whose width is a share of its frequency."""
    edges = hz * np.exp(np.array([-.5, .5]) * width_share)
    return x + undb(boost_db) * band(x, edges, "bandpass", order=1)


def colour(x, points, size=8192):
    """Causal filter through points (f/Hz, gain/dB), from the cepstrum of its log gain."""
    hz, db = np.transpose(points)
    f = np.maximum(np.arange(size // 2 + 1) * SR / size, 1)
    cepstrum = irfft(np.log(undb(np.interp(np.log(f), np.log(hz), db))))
    cepstrum[1:size // 2] *= 2
    cepstrum[size // 2 + 1:] = 0
    response = irfft(np.exp(rfft(cepstrum)))
    return signal.oaconvolve(x, response[None, :size // 2], axes=1)[:, :x.shape[1]]


def curve(table):
    """The columns of a table, joined by straight lines in time."""
    s, *columns = np.transpose(table)
    return [np.interp(TIME, s, column) for column in columns]


def bearing(s):
    """Left and right gains of a click at time s, as the microphone turns."""
    return pan(np.interp(s, *np.transpose(CLICK_BEARING)))


def pan(db):
    """Left and right gains for a level difference."""
    return undb(np.array([[.5], [-.5]]) * db)


def add(out, s, x):
    """Mix a sound in at time s."""
    i = max(int(s * SR), 0)
    out[:, i:i + x.shape[-1]] += x[..., :N - i]


def undb(db):
    """Decibels to amplitude."""
    return np.exp(np.asarray(db) * np.log(10) / 20)


def unit(x):
    """Scale to rms 1."""
    return x / np.sqrt(np.mean(x ** 2) + 1e-30)


def scene():
    """The cabin as the microphone hears it, with the lid close and nearly dry."""
    mechanisms = cabin(clicks() + knocks() + key() + creaks(), wet_db=-19, low_t60=.13, high_t60=.1)
    slam = cabin(lid(), wet_db=-18.5, low_t60=.14, high_t60=.08)
    slam = stress(slam, 94, boost_db=-10, width_share=.66)  # a slight lift in the bass
    slam = microphone_ports(band(slam, 11000, "lowpass", order=4), SLAM_BALANCE, lag_ms=.0094)
    rubbing = scuffs() + swishes() + judder() + leather() + cloth() + padding()
    return mechanisms + slam + thumps() + boom() + rubbing + handling() + hum() + room_tone()


def record(dry):
    """The recorder clips at full scale and cuts the treble above 15.5 kHz."""
    top_cut = signal.ellip(8, .2, 70, 15500, fs=SR, output="sos")
    return signal.sosfilt(top_cut, np.clip(dry, -1, 1))


dry = scene()
out = record(dry)
inscribe(out)
```